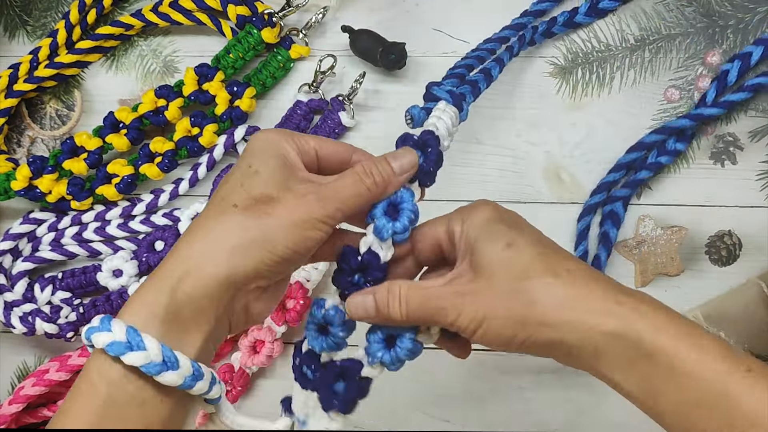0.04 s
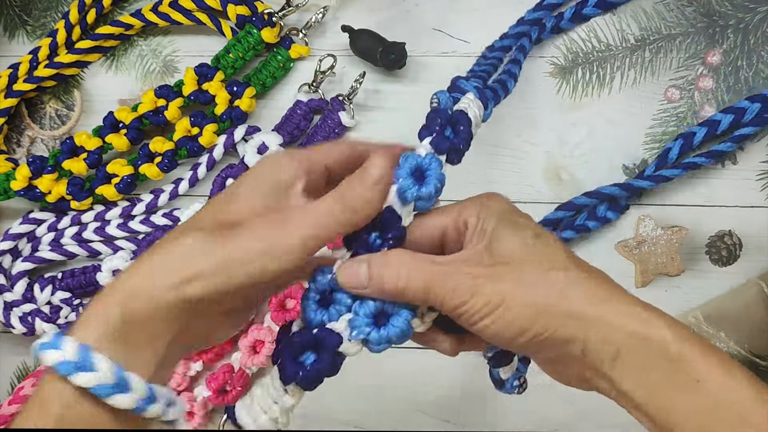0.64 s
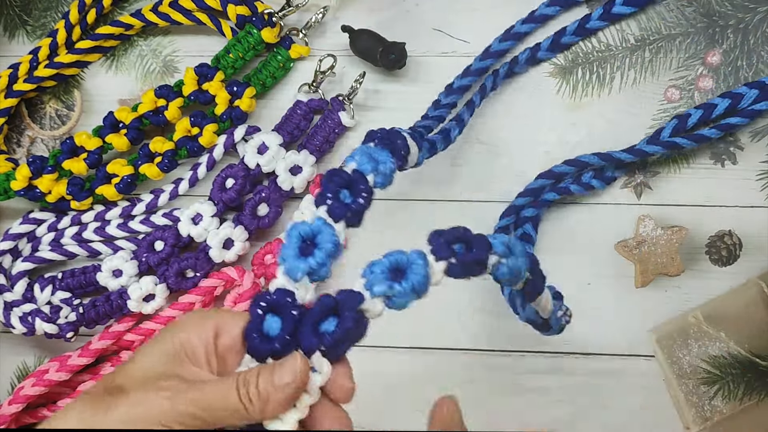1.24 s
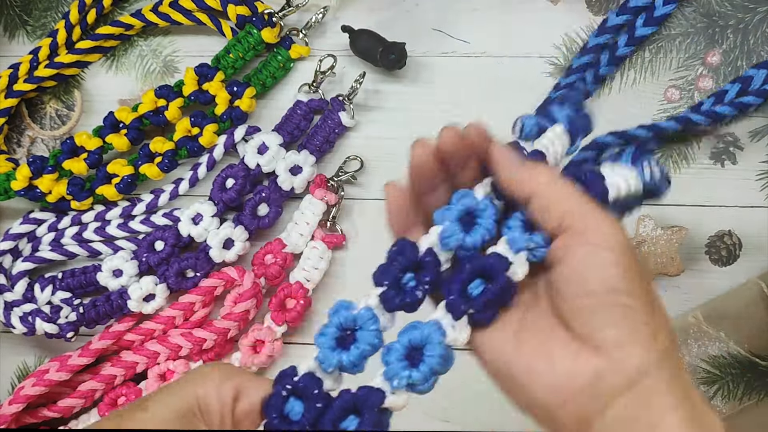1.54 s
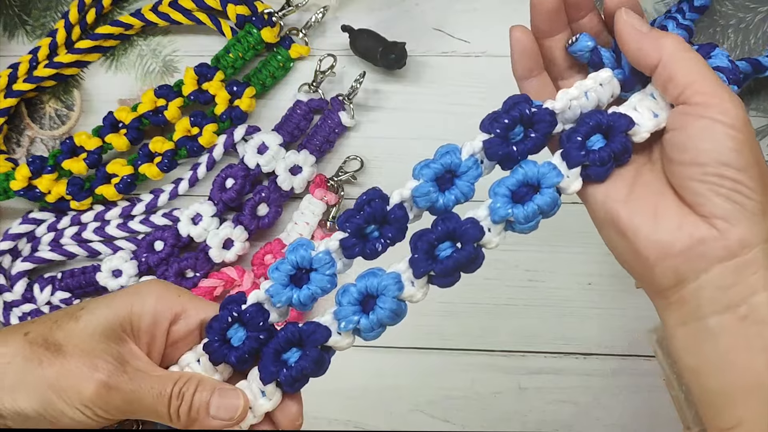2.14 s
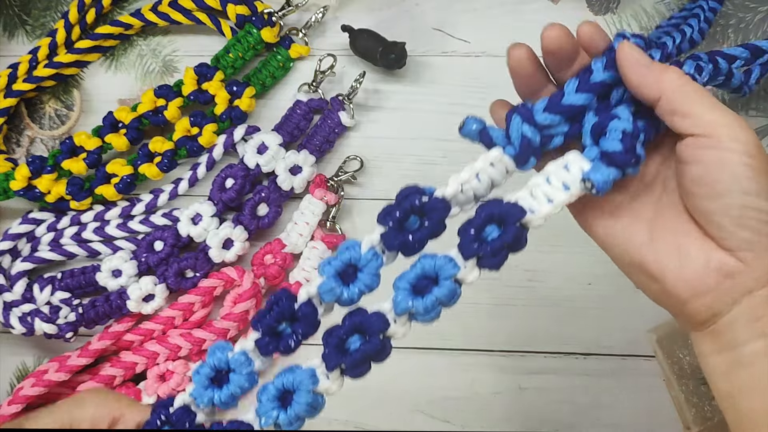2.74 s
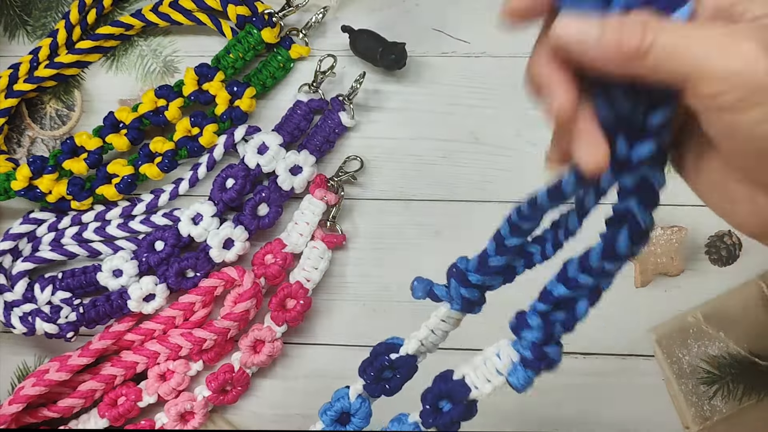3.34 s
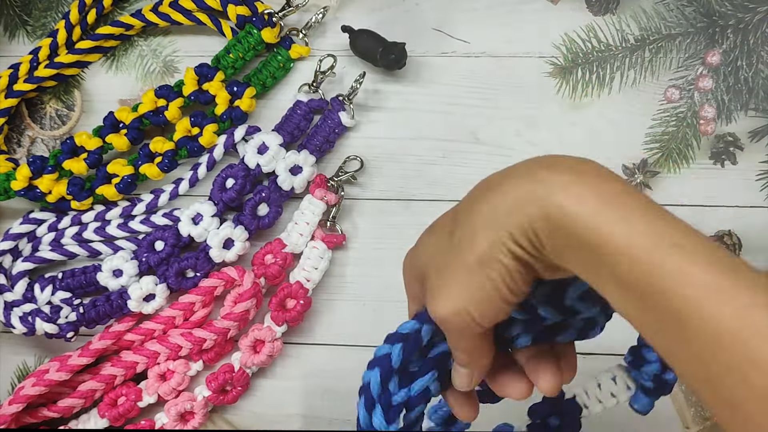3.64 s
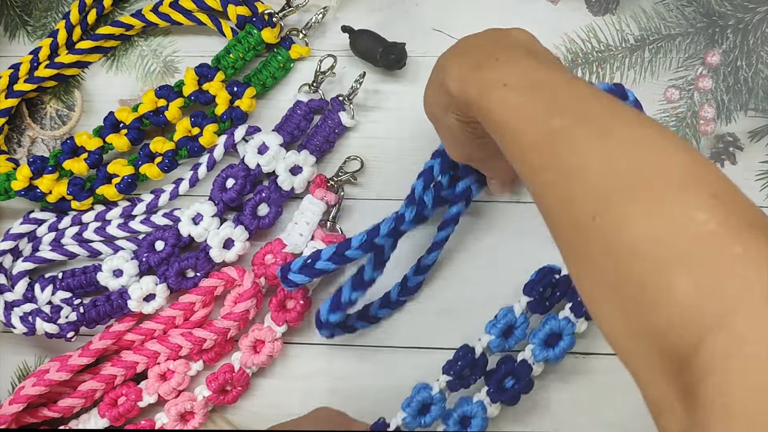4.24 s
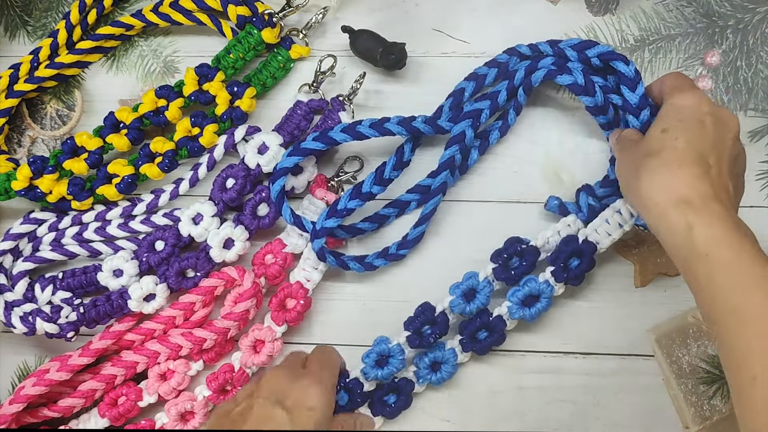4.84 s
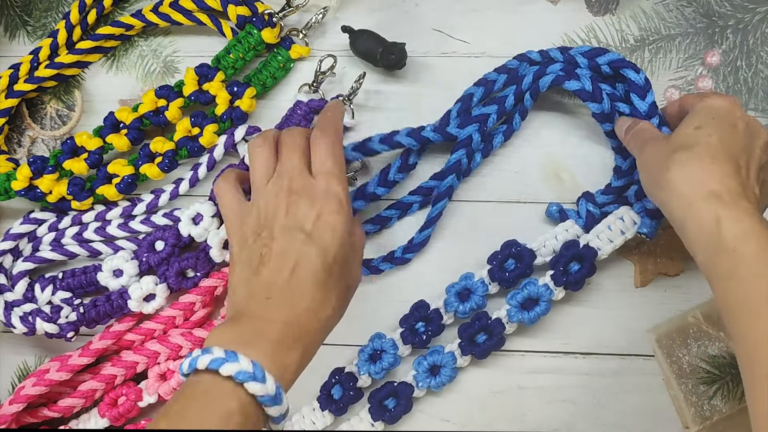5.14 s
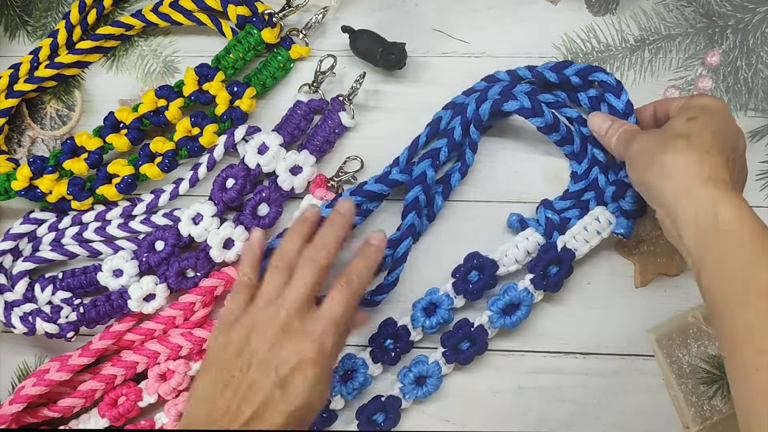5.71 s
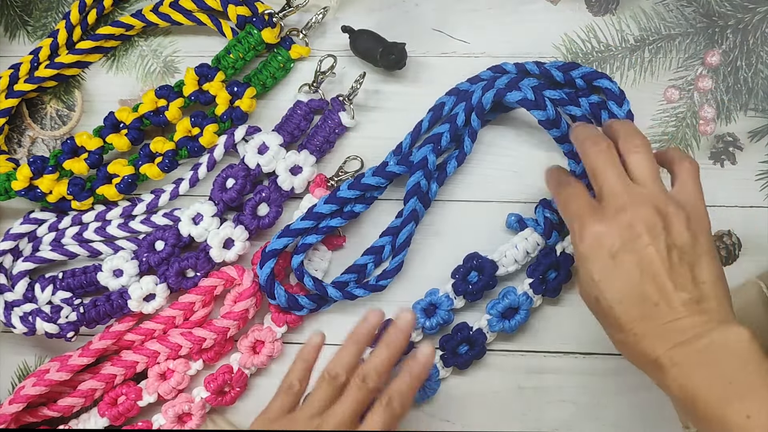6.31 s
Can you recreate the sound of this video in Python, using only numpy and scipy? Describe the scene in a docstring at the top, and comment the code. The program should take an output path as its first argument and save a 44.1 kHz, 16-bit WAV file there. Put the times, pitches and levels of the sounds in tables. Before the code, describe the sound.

Braided cord straps rustle through hands, with metal clasps clicking and knocking on a wooden table in a quiet room.

```python
"""Braided straps on a wooden table

Cord straps are picked up and laid out close to a stereo microphone in a quiet room.
The braid rustles through the hands, knots tick and rub, metal clasps click and knock on the board,
and fingers and knots thump it softly. Under it lie an even, low hum and the steady air of the room."""
import sys
import numpy as np
from scipy import signal
from scipy.fft import rfft, irfft, next_fast_len
from scipy.io import wavfile
from scipy.ndimage import uniform_filter1d, map_coordinates

SR = 44100
rng = np.random.default_rng(int(sys.argv[2]) if len(sys.argv) > 2 else 0)


def waveform_to_disk(signal):
    """Save audio, clipped to [-1, 1], as 16-bit WAV at the path in sys.argv[1]."""
    frames = np.transpose(np.atleast_2d(signal))
    scaled = np.clip(frames, -1, 1) * 32767
    samples = np.round(scaled).astype(np.int16)
    wavfile.write(sys.argv[1], SR, samples)


N = 289737
PLUS_MINUS = np.array([[1], [-1]])  # opposite signs for a pair of channels


def amp(db):
    """Decibels to gain."""
    return 10 ** (np.asarray(db) / 20)


def unit(x):
    """Scale to rms 1."""
    return x / np.sqrt(np.mean(x ** 2) + 1e-20)


def along(points, hz):
    """Read (Hz, value) points on a log frequency axis."""
    f, v = np.transpose(points)
    return np.interp(np.log(hz + 1), np.log(f), v)


def filtered(x, response):
    """Shape x by a gain that depends on frequency."""
    n = x.shape[-1]
    m = next_fast_len(n + 8192)
    return irfft(rfft(x, m) * response(np.fft.rfftfreq(m, 1 / SR)), m)[..., :n]


def noise(spectrum, size):
    """Two unrelated channels of coloured noise of rms 1."""
    return unit(filtered(rng.standard_normal((2, size)), lambda hz: amp(along(spectrum, hz))))


def wander(t, per_s):
    """A smooth random curve through per_s points a second."""
    return map_coordinates(rng.standard_normal(N // 100), [t * per_s])


def sine(t, hz, phase=0):
    """A pure tone of peak 1."""
    return np.sin(2 * np.pi * hz * t + phase)


def fade(t, t60):
    """Exponential decay by 60 dB in t60 seconds."""
    return np.exp(-np.log(1000) * t / t60)


def add(track, start, sound):
    """Mix a sound into the track at start seconds."""
    part = track[:, round(start * SR):][:, :sound.shape[-1]]
    part += sound[..., :part.shape[1]]


# Sound from all sides at the microphone. Each row: frequency in Hz, left-right correlation.
LIKENESS = [(60, 0.86), (125, 0.39), (200, 0.053), (310, 0.36), (1100, 0.43), (3100, 0.029), (6000, -0.088)]
def diffuse(pair):
    """Sound from all sides: alike on both channels in the deep bass, unrelated in the treble."""
    mid, side = filtered(pair, lambda hz: np.sqrt(1 + PLUS_MINUS * along(LIKENESS, hz)))
    return unit(np.array([mid + side, mid - side]))


# The air of the room. Each row: frequency in Hz, relative level in dB.
AIR_SPECTRUM = [(25, -34), (45, -14.5), (75, -8.5), (125, -5), (175, -3.5), (250, -5.5), (320, -6),
                (380, -13), (750, -15), (880, -15), (1010, -11), (1200, -13.5), (3000, -16), (6000, -34),
                (9000, -37), (15000, -26)]
# The room's hum. Each row: frequency in Hz, rms level in dB.
HUM_LINES = [(99.6, -63), (120.4, -67.5), (298.4, -68.5), (316.3, -71)]
# Faint tones, far off. Each row: centre in seconds, length in seconds, pitch in Hz, level in dB.
FAR_TONES = [(4.73, 0.11, 435, -58), (4.906, 0.16, 427, -59), (5.14, 0.22, 443.5, -62),
             (5.777, 0.18, 513, -64)]
def room_tone(air_db=-52.0, drift_rad=0.4):
    """Steady air, an even hum whose lines drift a little, and far tones that swell and fade."""
    t = np.arange(N) / SR
    hum = sum(amp(db) * sine(t, hz, drift_rad * wander(t, per_s=2)) for hz, db in HUM_LINES)
    far = sum(amp(db) * sine(t, hz) * np.exp(-(2 * (t - centre) / length) ** 2)
              for centre, length, hz, db in FAR_TONES)
    return amp(air_db) * diffuse(noise(AIR_SPECTRUM, N)) + np.sqrt(2) * (hum + far)


def from_hands(pair, direct_share=0.22, lag_s=0.00015):
    """Part of the sound comes straight from the hands, left channel first; the rest from all sides."""
    mid, side = pair * np.sqrt(1 + PLUS_MINUS * direct_share)
    stereo = np.array([mid + side, mid - side])
    return unit(filtered(stereo, lambda hz: np.exp(1j * np.pi * hz * lag_s * PLUS_MINUS)))


def pull(t, start, length, speed_power=0.55):
    """One pull is an arch of sliding speed; friction noise grows as a power of that speed."""
    speed = np.abs(np.sin(np.pi * np.clip((t - start) / length, 0, 1)))
    return speed ** speed_power


# Pulls of braid over skin and wood. Each row: start and length in seconds, full-speed level in dB.
PULLS = [(0.05, 0.084, -60), (0.154, 0.068, -50), (0.446, 0.055, -54), (0.555, 0.44, -48),
         (0.998, 0.16, -46), (1.2, 0.052, -49.5), (1.25, 0.23, -46.5), (1.51, 0.1, -51),
         (1.736, 0.13, -51.5), (1.984, 0.044, -45), (2.06, 0.68, -56), (2.305, 0.04, -52),
         (2.41, 0.098, -52.5), (2.537, 0.98, -46), (2.61, .065, -47.5), (3.584, 0.22, -55),
         (3.81, 0.088, -49), (3.912, 0.15, -46.5), (4.78, 0.59, -57.5), (5.13, 0.42, -54.5),
         (5.404, 0.67, -53), (5.887, 0.059, -43), (6.24, 0.18, -53), (6.481, 0.1, -49)]
def sliding(held_db=-57.5, lying_db=-62.5, let_go_s=4.1, take_hold_s=4.77, grip_s=0.32, plait_db=0.86):
    """Strength of the rustle: pulls over the creep of held braid, made uneven by passing plaits."""
    t = np.arange(N) / SR
    grip = np.where(t < let_go_s, 1, np.clip((t - take_hold_s) / grip_s, 0, 1))
    power = amp(lying_db + (held_db - lying_db) * grip) ** 2
    for start, length, db in PULLS:
        power += (amp(db) * pull(t, start, length)) ** 2
    return np.sqrt(power) * amp(plait_db * wander(t, per_s=18))


# Sliding braid, heard close. Each row: frequency in Hz, relative level in dB.
BRAID_SPECTRUM = [(300, -38), (1200, -11.5), (2500, -7), (3300, -8.5), (3700, 1), (5300, -4.5), (6100, -7),
                  (7200, -3), (10000, -7), (11700, -7.5), (13000, -12.5), (15500, -11)]
# Strands catching. Each row: frequency in Hz, relative level in dB.
STRAND_SPECTRUM = [(300, -41), (2500, 1), (3800, -6), (5200, 7), (6500, -7), (15000, -4)]
def rustle(level_db=-1.5, catches_per_s=160, catch_db=-5.5, catch_t60=0.031, patchy_db=2):
    """Fibres slide with a hiss whose colour keeps shifting; single strands catch and let go."""
    spectra = signal.stft(noise(BRAID_SPECTRUM, N), nperseg=512)[2]
    patches = uniform_filter1d(rng.standard_normal(spectra.shape[1:]), size=4, axis=0)  # over frequency
    patches = uniform_filter1d(patches, size=12, axis=1)  # over time
    hiss = unit(signal.istft(spectra * amp(patchy_db * unit(patches)), nperseg=512)[1][:, :N])
    slips = (rng.random(N) < catches_per_s / SR) * amp(3 * np.minimum(rng.exponential(size=N), 2))
    grains = signal.lfilter([1], [1, -fade(1 / SR, catch_t60)], slips)
    strength = amp(level_db) * sliding()
    catches = grains * noise(STRAND_SPECTRUM, N)
    return strength * (from_hands(hiss) + amp(catch_db) * from_hands(catches))


# Small ticks of knots and clasp rings. Each row: start in seconds, level in dB, treble fizz in dB.
SMALL_TICKS = [(0.2264, -36, -3), (0.2466, -36, -0.5), (0.532, -34.5, -7.5), (1.026, -41, 8),
               (1.043, -41, 9), (1.822, -33, 1), (1.8472, -35.5, 7), (1.995, -38, -2), (2.028, -33, -20),
               (2.0832, -21.5, -10), (2.168, -36.5, 4), (2.3145, -27, -21), (2.383, -27, -30),
               (2.4184, -30.5, 7), (2.45, -33, -1), (2.4865, -31.5, -6), (2.6293, -31.5, 7),
               (4.061, -30, 2.5), (5.9555, -40, 2), (6.289, -29, -5), (6.3025, -22, -12), (6.506, -32, -6),
               (6.519, -37, 0)]
# The scratch of a tick. Each row: frequency in Hz, relative level in dB.
SCRATCH_SPECTRUM = [(300, -7.5), (1500, -14.5), (3000, -8), (4500, -3.5), (6000, -8), (7200, -0.5),
                    (10000, -6.5), (15000, -12.5)]
def ticks(level_db=-4.5, snap_t60=0.03, drag_db=-20, drag_t60=0.05, rasps_per_s=600, rasp_db=2):
    """A knot slips, or a finger touches down, with a dry, rasping tick and drags on for a moment."""
    out, t = np.zeros((2, N)), np.arange(SR // 12) / SR
    envelope = (fade(t, snap_t60) + amp(drag_db) * fade(t, drag_t60)) * (1 - np.exp(-t / 0.00021))
    shelf = [(5000, 0.12), (10000, 0.99)]  # Hz, share of the fizz
    touches = [(start, db, fizz_db) for start, _, _, _, db, fizz_db in SOFT_LANDINGS]
    for start, db, fizz_db in SMALL_TICKS + touches:
        scratch = filtered(noise(SCRATCH_SPECTRUM, len(t)), lambda hz: amp(fizz_db * along(shelf, hz)))
        rasp = amp(rasp_db * map_coordinates(rng.standard_normal(len(t)), [t * rasps_per_s]))
        add(out, start, amp(db + level_db) * scratch * rasp * envelope)
    return out


# Sharp clasp clicks and a close reflection of one, near the microphone. Each row: start in seconds,
# level in dB, pitch in Hz, ring time (t60) in seconds, crack and side modes in dB re the main mode.
CLASP_CLICKS = [(0.2748, -34, 2900, 0.0063, -9, 2), (1.028, -34, 2090, .01, -6, -1),
                (1.0452, -29.5, 2200, 0.0073, -5, 9), (2.0538, 5, 3250, 0.0028, -22, -4),
                (2.0558, -10.5, 4000, 0.0063, -17, -4), (2.0577, -20, 3600, 0.011, -10, -5),
                (2.0660, -21, 3500, .006, -16, -3), (2.0728, -23, 3600, .008, -14, -6),
                (2.2187, -6.5, 3990, 0.0069, -19, 0), (2.2267, -29, 4100, .006, 2, 2),
                (2.2313, -26, 4330, 0.007, -10, -5), (5.1249, -24, 4760, 0.0097, -6, 4),
                (5.2023, -23, 4100, 0.0025, -3, 0), (5.8602, -31, 3760, 0.01, -10, 9),
                (5.8628, 0, 3570, 0.0048, -19, 12.5), (5.8747, -5, 4290, 0.007, -13.5, -9),
                (5.8762, 0, 4280, 0.0046, -18, -6), (5.8800, -14, 4200, 0.009, -14, -3),
                (5.883, -22, 4600, .007, 0, -3), (5.8866, -12, 4900, 0.0066, -2.5, -9),
                (5.8877, -19, 5080, 0.012, -3, -9), (5.9085, -34, 4150, .008, 3, 0),
                (6.496, -29.5, 5070, 0.017, -8, 1)]
# A clasp's side modes. Each row: multiple of its pitch, level in dB, multiple of its ring time.
CLASP_MODES = [(0.811, -15, 0.66), (1.2, -21.5, 2)]
# The crack of metal landing. Each row: frequency in Hz, relative level in dB.
CRACK_SPECTRUM = [(300, 4), (1500, -0.5), (3600, 2), (5200, -5.5), (6200, -2), (10000, -1), (15000, -13)]
def clasps(crack_t60=0.016, scatter_db=-31, scatter_t60=0.071, lead_rad=0.35, pan_db=1.5, low_hz=2080):
    """A clasp, damped by its cord, rings briefly; things on the table scatter the click."""
    out, t = np.zeros((2, N)), np.arange(SR // 6) / SR
    attack = 1 - np.exp(-t / 0.00018)
    for start, db, hz, t60, crack_db, side_db in CLASP_CLICKS:
        main = sine(t, hz, lead_rad * PLUS_MINUS) * fade(t, t60)  # a little earlier on the left
        sides = sum(amp(level) * sine(t, hz * ratio) * fade(t, t60 * stretch)
                    for ratio, level, stretch in CLASP_MODES)
        spray = amp(crack_db) * fade(t, crack_t60) + amp(scatter_db) * fade(t, scatter_t60)
        crack = spray * noise(CRACK_SPECTRUM, len(t))
        add(out, start, amp(db) * (main + amp(side_db) * sides + crack) * attack)
    out *= amp(-pan_db * PLUS_MINUS)  # louder on the right
    return signal.lfilter(*signal.butter(2, low_hz, 'high', fs=SR), out)  # small parts radiate treble


def knot_rub(level_db=-62.5, centre_hz=2210, width_hz=1000):
    """Knots dragged once across the board: a broad resonance, lower than the hiss of loose braid."""
    swell = pull(np.arange(N) / SR, start=0.45, length=0.95)
    friction = rng.standard_normal((2, N))
    body = filtered(friction, lambda hz: 1 / (1 + (2 * (hz - centre_hz) / width_hz) ** 2))
    return amp(level_db) * swell * from_hands(body)


# Fingers and knots landing on the table. Each row: start in seconds, thump level in dB, pitch in Hz,
# ring time (t60) in seconds, then level and fizz in dB of the touch that ticks() plays.
SOFT_LANDINGS = [(2.0058, -36.5, 196, 0.053, -31.5, 5.5), (2.053, -23, 188, 0.037, -36, 0),
                 (2.0965, -30, 176, 0.14, -23.5, -5), (2.219, -24, 175, 0.029, -26.5, -2),
                 (2.2644, -24.5, 205, 0.026, -31, -7), (5.0381, -21, 215, 0.029, -28, 3),
                 (5.1225, -16, 190, 0.039, -26, -6), (5.2017, -19.5, 217, 0.021, -24, 6),
                 (5.8753, -21, 195, 0.051, -28, 2), (6.2626, -24.5, 181, 0.07, -36, -2),
                 (6.298, -26.5, 172, 0.097, -20.5, -8), (6.3502, -31, 184, 0.027, -32, -1)]
def thumps(rise_s=0.0026, upper_db=-22, pat_hz=690, pat_db=-26, pat_t60=0.043, sway_db=-33, firm_db=-19):
    """Soft contact builds over milliseconds and moves the board's lowest modes, with a woody pat."""
    out, t = np.zeros((2, N)), np.arange(SR // 4) / SR
    sway_hz, _, sway_t60 = BOARD_MODES[0]
    sway = amp(sway_db) * sine(t, sway_hz) * fade(t, sway_t60)  # the whole top flexes
    pat = amp(pat_db) * sine(t, pat_hz) * fade(t, pat_t60)
    attack = 1 - np.exp(-(t / rise_s) ** 2)
    for start, db, hz, t60, _, _ in SOFT_LANDINGS:
        upper = amp(upper_db) * sine(t, 1.83 * hz) * fade(t, t60)
        ring = (sine(t, hz) - upper) * fade(t, t60)
        sink_s = 0.0003 * max(firm_db - db, 0)  # a gentler landing takes longer to sink in
        add(out, start + sink_s, amp(db) * ((ring + sway) * attack + pat))
    return out


# Blows that ring the board. Each row: start in seconds, level in dB, treble cutoff in Hz,
# share of the ring time that the hand leaves.
BOARD_BLOWS = [(2.0559, -23.5, 700, 0.32), (2.0988, -16, 480, 0.69), (2.2632, -25, 600, 0.68),
               (5.2023, -22.5, 1400, 0.7), (5.866, -12, 1600, 0.83), (5.8762, -2.5, 2300, 0.64),
               (5.887, -23, 2000, 0.59), (5.901, -23.5, 3500, 0.57), (6.3, -42, 2000, 0.7)]
# The table top's main modes. Each row: frequency in Hz, level in dB, ring time (t60) in seconds.
BOARD_MODES = [(86.2, -25.5, 0.3), (194, -16, 0.11), (309, -12.5, 0.19), (509, -8, 0.11),
               (674, -13.5, 0.16), (880, -6, 0.036), (987, -1.5, 0.041), (1074, -1.5, 0.051),
               (1312, -5.5, 0.07), (1405, -6, 0.073), (1530, -15.5, 0.17), (1605, -15, 0.13),
               (1830, 1, 0.027), (2156, -10.5, 0.077)]
# The wood's slap and close-packed modes. Each row: frequency in Hz, relative level in dB.
WOOD_SPECTRUM = [(100, -20), (260, 6.5), (390, 3), (800, 3), (1100, -0.5), (2300, 5), (5000, -21),
                 (12000, -35)]
def knocks(modes_db=-8.5, haze_db=-18, haze_t60=0.16, slap_db=-14, slap_t60=0.013, rise_s=0.0006):
    """Each blow, with its own brightness, slaps the board and rings main modes and a haze of others."""
    out, t = np.zeros((2, N)), np.arange(SR // 3) / SR
    for start, db, cutoff_hz, ring_share in BOARD_BLOWS:
        ring = 0
        for hz, level, t60 in BOARD_MODES:
            phase = 0.19 * rng.standard_normal((2, 1))  # each channel hears another part of the board
            ring += amp(level + rng.normal(0, 1)) * sine(t, hz, phase) * fade(t, t60 * ring_share)
        envelope = amp(haze_db) * fade(t, haze_t60 * ring_share) + amp(slap_db) * fade(t, slap_t60)
        wood = diffuse(noise(WOOD_SPECTRUM, len(t))) * envelope
        blow = (amp(modes_db) * ring + wood) * (1 - np.exp(-t / rise_s))
        add(out, start, amp(db) * signal.lfilter(*signal.butter(1, cutoff_hz, fs=SR), blow))
    return out * amp(0.3 * PLUS_MINUS)  # just left of centre


def echo(x, decay, delay_s):
    """Reflections whose frequencies each die at their own speed."""
    hz, t, spectra = signal.stft(rng.standard_normal((2, SR // 2)), SR, nperseg=256)
    tail = signal.istft(spectra * fade(t, along(decay, hz)[:, None]), SR, nperseg=256)[1]
    tail = np.pad(tail / np.linalg.norm(tail[0]), ((0, 0), (round(delay_s * SR), 0)))
    return signal.fftconvolve(x, tail, axes=1)[:, :N]


# The desk corner, close by. Each row: frequency in Hz, decay time (t60) in seconds.
CORNER_DECAY = [(150, 0.098), (1000, 0.13), (4000, 0.08), (14000, 0.14)]
# The walls, farther off. Each row: frequency in Hz, decay time (t60) in seconds.
WALL_DECAY = [(150, 0.34), (1000, 0.4), (4000, 0.49), (14000, 0.71)]
def scene(corner_db=-12, walls_db=-22, low_hz=70):
    """Close contacts on the table with their reflections, over rustle, rubbing and room tone."""
    hits = clasps() + knocks() + thumps() + ticks()
    hits = signal.lfilter(*signal.butter(2, low_hz, 'high', fs=SR), hits)  # the board gives no deep bass
    corner = amp(corner_db) * echo(hits, CORNER_DECAY, delay_s=0.0026)
    walls = amp(walls_db) * echo(hits, WALL_DECAY, delay_s=0.0077)
    return hits + corner + walls + rustle() + knot_rub() + room_tone()


# The microphone's two ports. Each row: frequency in Hz, left minus right in dB.
PORT_BALANCE = [(100, -1.5), (200, 0.5), (700, 1.5), (2300, 0.5), (3200, -1.5), (4300, -6), (6000, -1.5),
                (8000, 1.5), (15000, -2)]
def record(dry, notch_hz=8500, notch_q=1.65, top_hz=16000):
    """The microphone's ports differ in colour and share a notch; the recorder is band-limited."""
    x = signal.lfilter(*signal.iirnotch(notch_hz, notch_q, fs=SR), dry)
    x = filtered(x, lambda hz: amp(0.5 * PLUS_MINUS * along(PORT_BALANCE, hz)))
    return filtered(np.clip(x, -1, 1), lambda hz: hz < top_hz)


dry = scene()
out = record(dry)
waveform_to_disk(out)
```